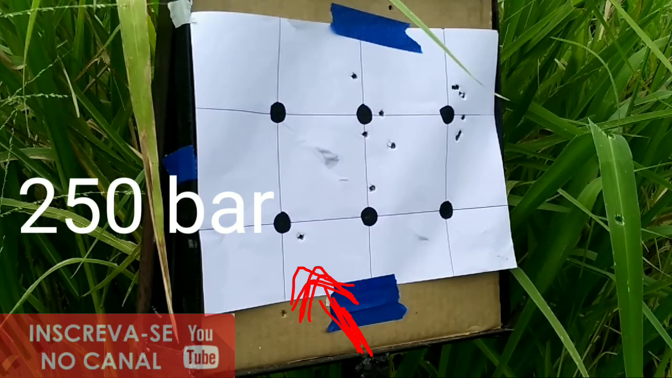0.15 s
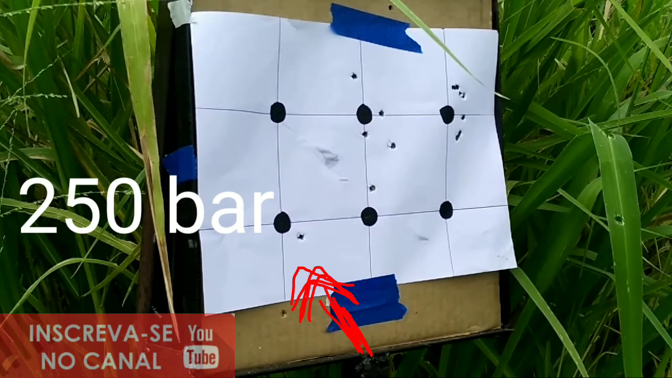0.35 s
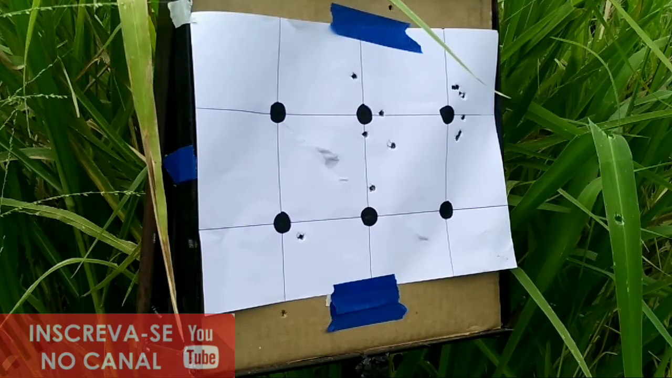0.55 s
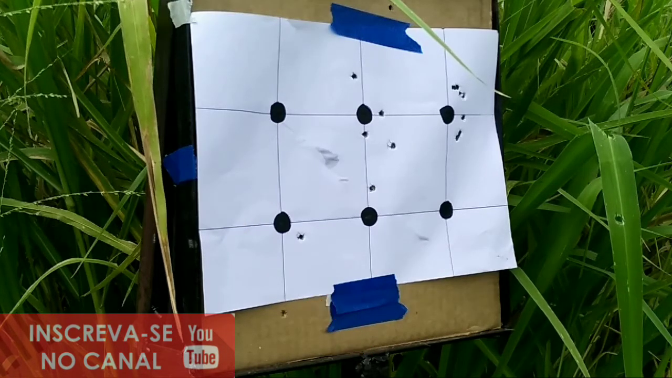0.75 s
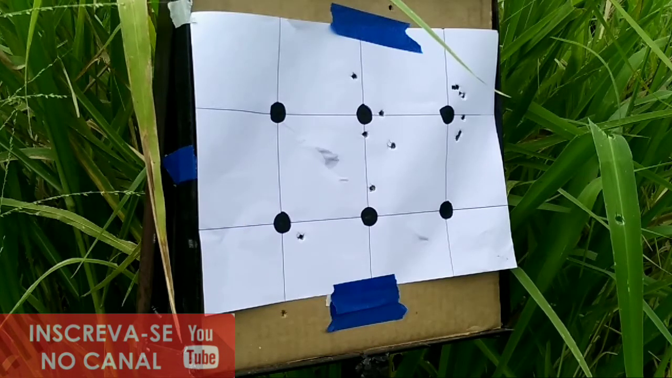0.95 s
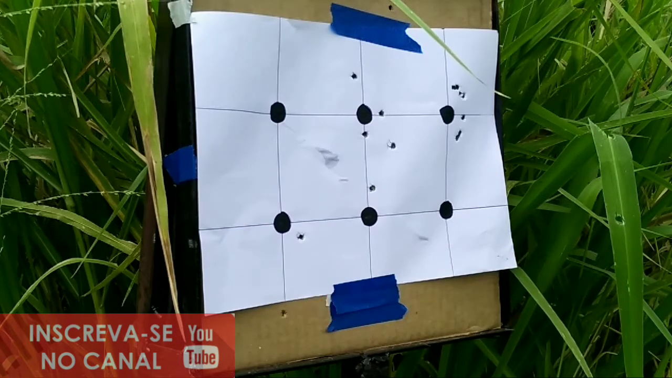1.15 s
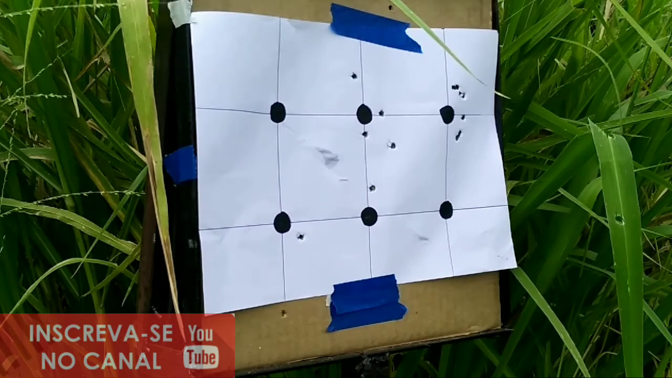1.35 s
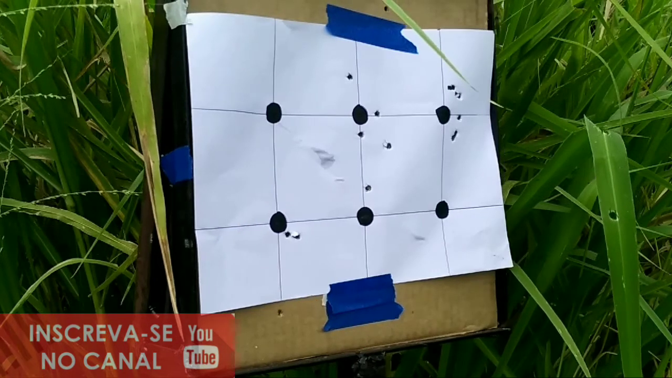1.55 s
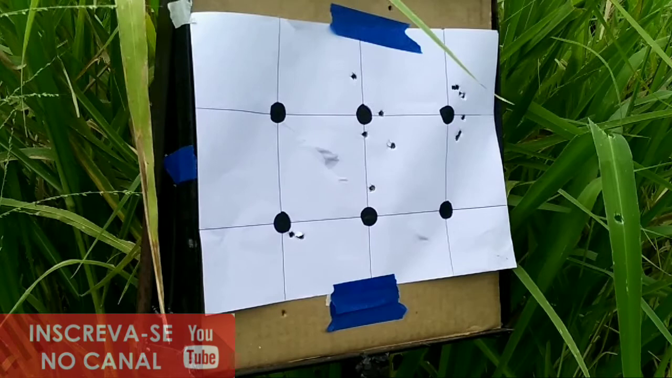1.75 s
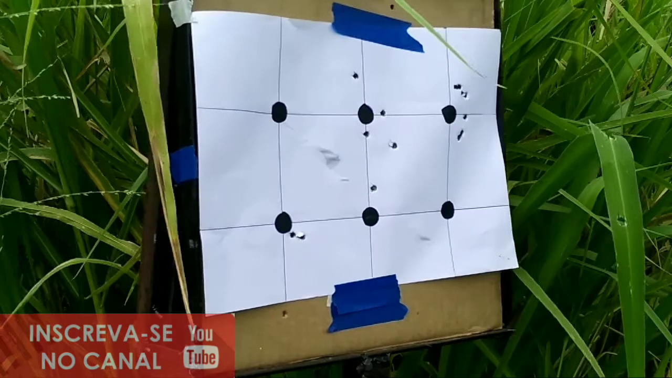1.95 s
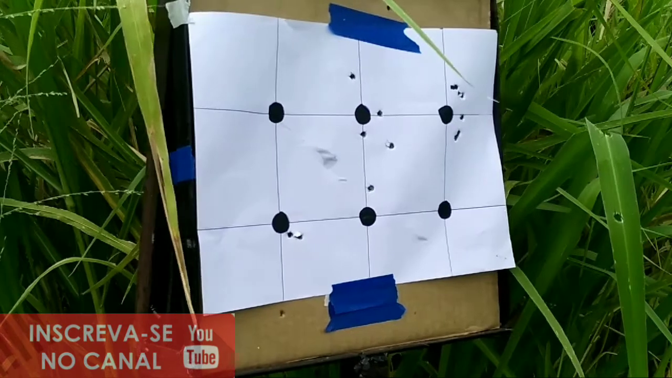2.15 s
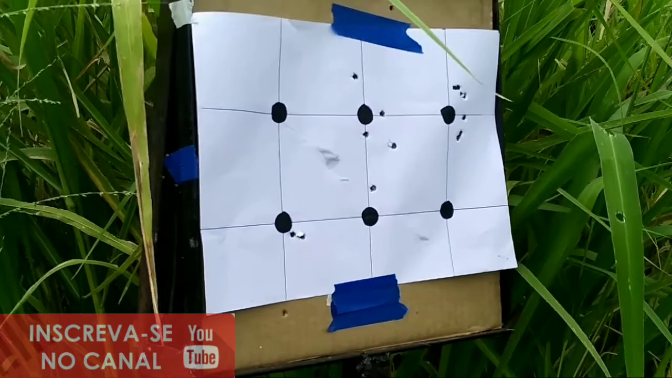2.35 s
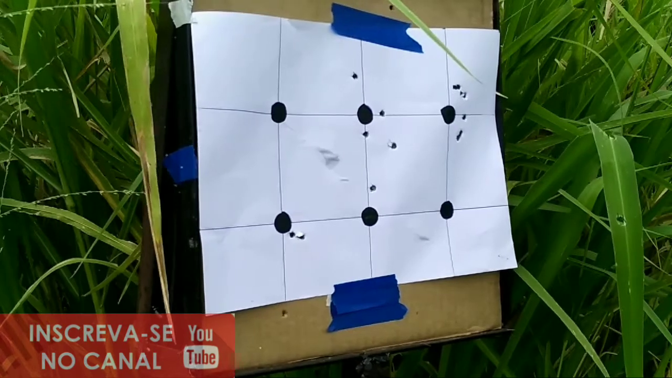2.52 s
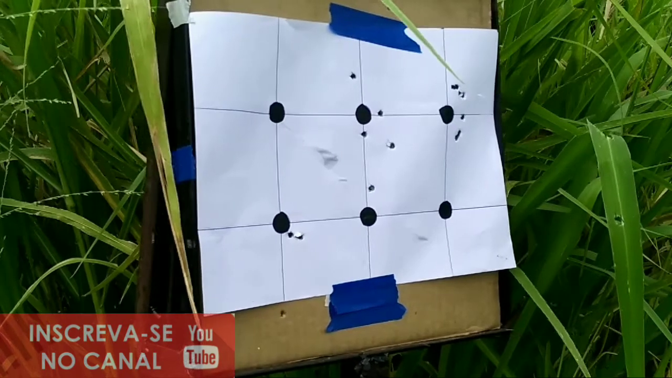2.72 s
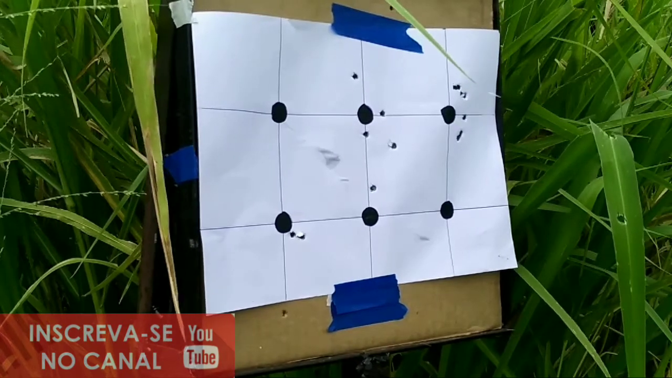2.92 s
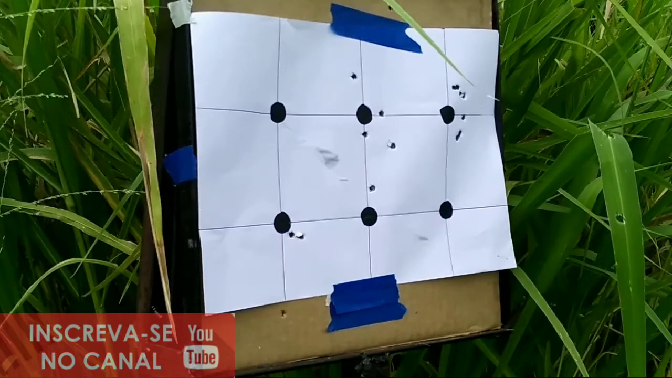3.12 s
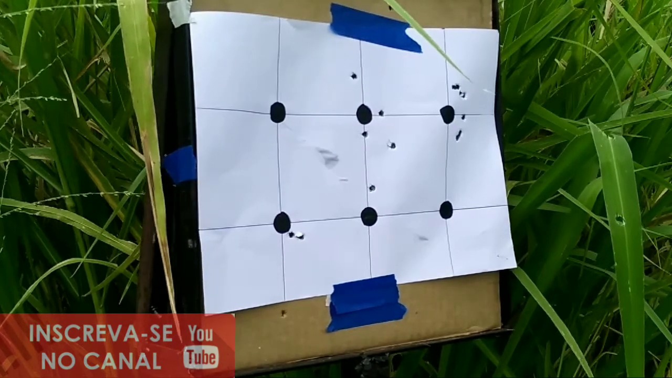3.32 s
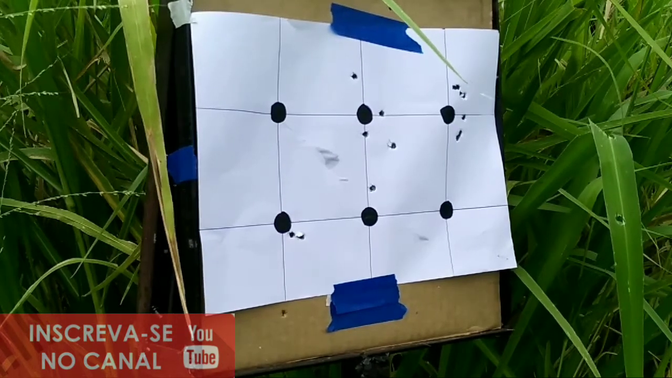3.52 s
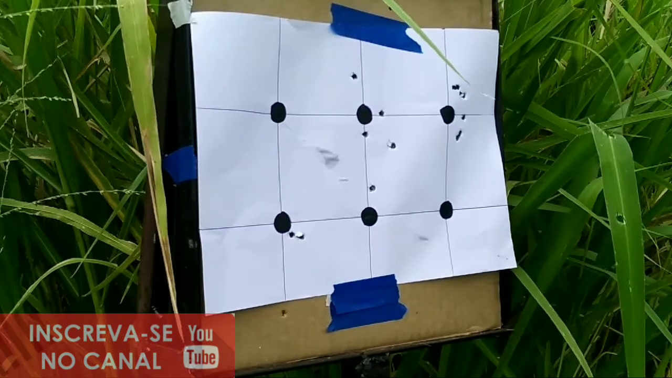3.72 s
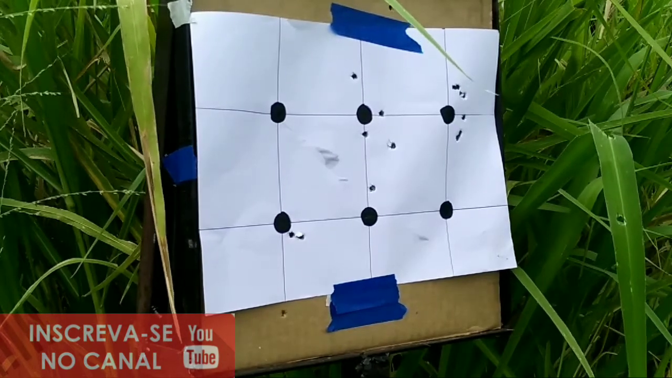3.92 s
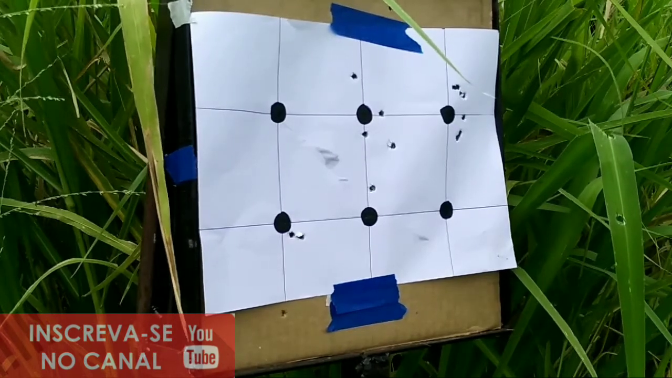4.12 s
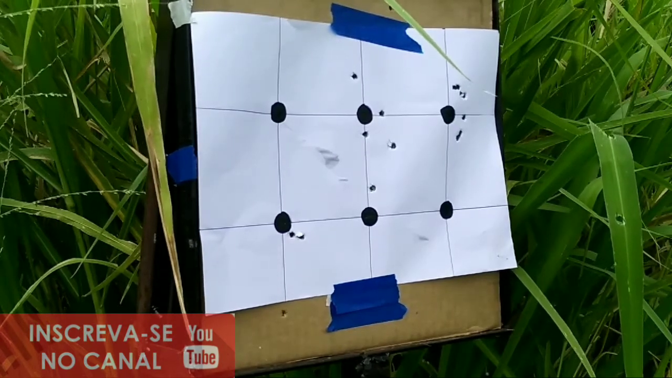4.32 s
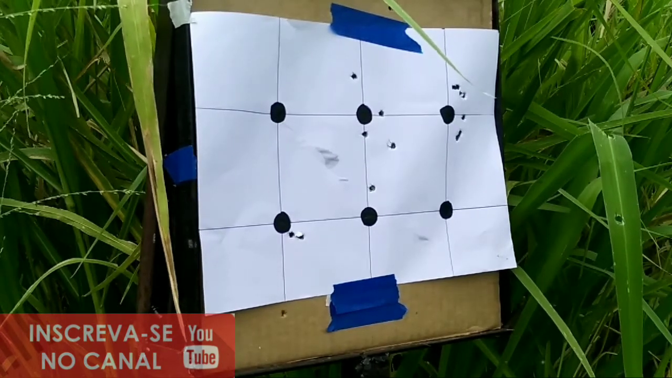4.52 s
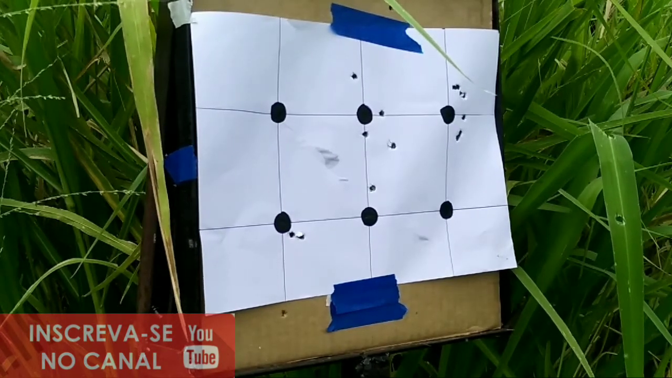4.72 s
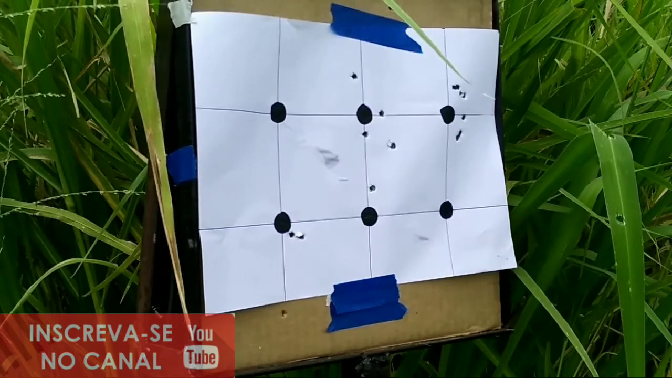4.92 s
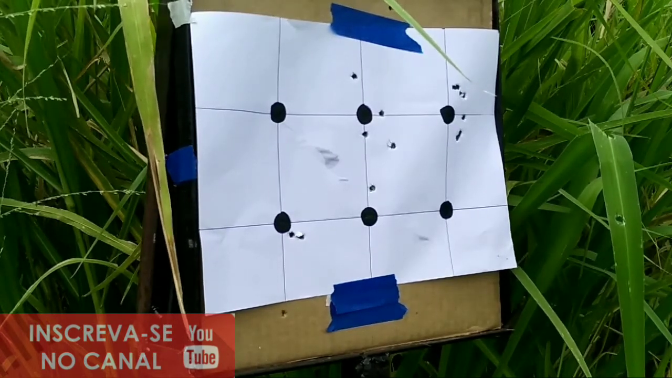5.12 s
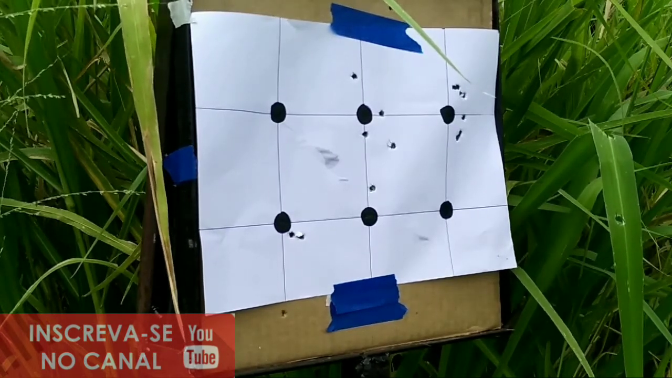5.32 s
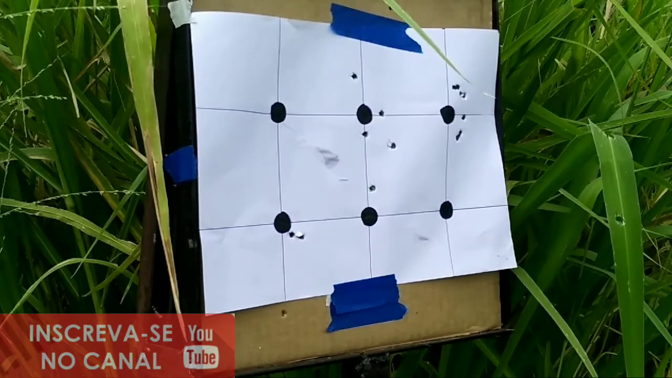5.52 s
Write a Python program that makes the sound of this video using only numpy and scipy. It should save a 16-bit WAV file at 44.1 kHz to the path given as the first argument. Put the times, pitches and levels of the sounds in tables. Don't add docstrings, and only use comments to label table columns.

```python
import sys
import numpy as np
from scipy import signal
from scipy.fft import rfft, irfft, next_fast_len
from scipy.io import wavfile
from scipy.ndimage import uniform_filter1d, map_coordinates

SR = 44100
rng = np.random.default_rng(int(sys.argv[2]) if len(sys.argv) > 2 else 0)


def wav_out(sig):
    wavfile.write(sys.argv[1], SR, np.round(np.clip(np.atleast_2d(sig).T, -1, 1) * 32767).astype(np.int16))


def voltage_ratio(decibels):
    exponent = np.asarray(decibels, float) / 20
    return 10 ** exponent


N = 250047

# start in seconds, peak in dB, t60 in seconds,
# centre in Hz, width in Hz.
IMPACT_BURSTS = [
    (1.4995, 4, .093, 10000, 7500),
    (1.4996, -3, 0.085, 3400, 4600),
    (1.504, -2, .035, 1194, 1600),
    (1.509, -9, .095, 8500, 5860),
    (1.5, -4, .044, 272.3, 260),
    (1.505, -6, .03, 695, 296),
]


def unit(x):
    return x / np.sqrt(np.mean(x ** 2) + 1e-20)


def level_curve(rows):
    s, db = np.transpose(rows)
    return np.interp(np.arange(N) / SR, s, db)


def during(rows):
    t = np.arange(N) / SR
    inside = (t > rows[0][0]) & (t < rows[-1][0])
    return uniform_filter1d(inside * 1., size=40)


def arch(s, length, sharp):
    u = np.clip((np.arange(N) / SR - s) / length, 0, 1)
    return u, np.abs(np.sin(np.pi * u)) ** sharp


def wobble(rate, count=N):
    knots = rng.standard_normal(int(count * rate / SR) + 4)
    return map_coordinates(knots, [np.arange(count) * rate / SR])


def filtered(x, response):
    m = next_fast_len(len(x) + 8192)
    return irfft(rfft(x, m) * response(np.fft.rfftfreq(m, 1 / SR)), m)[:len(x)]


def resonance(hz, width_hz):
    return lambda f: 1j * f * width_hz / (hz * hz - f * f + 1j * f * width_hz)


def rush(spectrum, patchy_db):
    z = signal.stft(rng.standard_normal(N), nperseg=512)[2]
    patches = uniform_filter1d(rng.standard_normal(z.shape), size=6, axis=0)
    patches = uniform_filter1d(patches, size=10, axis=1)
    x = signal.istft(z * voltage_ratio(patchy_db * unit(patches)), nperseg=512)[1][:N]
    hz, db = np.transpose(spectrum)
    return unit(filtered(x, lambda f: voltage_ratio(np.interp(np.log(f + 1), np.log(hz), db))))


def bursts(rows):
    grain_db = 2
    out, t = np.zeros(N + SR), np.arange(SR // 4) / SR
    for s, db, rise, t60, hz, width_hz in rows:
        grain_gain = voltage_ratio(grain_db * np.repeat(rng.standard_normal(len(t) // 25), 25))
        grains = rng.standard_normal(len(t)) * grain_gain
        band = resonance(hz, width_hz)
        puff = unit(filtered(grains, lambda f: band(f) ** 2))
        size = voltage_ratio(db - 3 - 60 * t / t60) * (1 - np.exp(-t / rise))
        out[round(s * SR):][:len(t)] += size * puff
    return out[:N]


def blows(rows):
    rise_cycles = 1.5
    return bursts([(s, db, rise_cycles / hz, t60, hz, wide) for s, db, t60, hz, wide in rows])


def glide(s, length, first_hz, last_hz, db, drift_hz, flutter_db):
    n, out = round(length * SR), np.zeros(N + 2 * SR)
    u = np.arange(n) / n
    hz = first_hz + (last_hz - first_hz) * u + drift_hz * wobble(30, count=n)
    size = np.sin(np.pi * u) ** 0.57 * voltage_ratio(db + flutter_db * wobble(25, count=n))
    out[SR + round(s * SR):][:n] = size * np.sin(2 * np.pi * np.cumsum(hz) / SR)
    return out[SR:SR + N]


def wind():
    # time in seconds, buffet level in dB.
    gusts = [(0, -51.5), (1.04, -52.5), (1.85, -52.5), (2.24, -50.5), (3.06, -53), (3.89, -51.5),
             (4.4, -53), (5.27, -52), (5.67, -54)]
    # frequency in Hz, density in dB per Hz.
    rumble_spectrum = [(12, -42), (22, -16), (40, -8), (72, 2.5), (103, -9), (216, -23), (320, -45.5),
                       (550, -120)]
    distance_spectrum = [(70, -33.5), (120, -4.5), (210, -14.5), (280, -9.5), (600, -10), (1050, -12),
                         (2000, -20.5), (5000, -43.5)]
    grass_spectrum = [(800, -41.5), (2000, -7.5), (3600, -4), (6000, -2.5), (9000, -1), (13000, -7.5),
                      (15700, -4.5), (18000, -23)]
    distance_db, grass_db = -56, -58
    buffet = voltage_ratio(level_curve(gusts) + 0.94 * wobble(6.5)) * rush(rumble_spectrum, patchy_db=1.36)
    distance = voltage_ratio(distance_db + .45 * wobble(3.15)) * rush(distance_spectrum, patchy_db=1.3)
    grass = voltage_ratio(grass_db + .48 * wobble(3.15)) * rush(grass_spectrum, patchy_db=1.7)
    return buffet + distance + grass


def insects():
    # middle in seconds, length in seconds, level in dB, brightness in dB.
    strokes = [(-.02, .16, -53.5, 3.5), (.18, 0.31, -51.5, 1), (0.441, .22, -50, -1.5), (.72, 0.22, -52, 1),
               (.99, 0.24, -53, 1), (1.24, .22, -53, 1), (1.45, 0.19, -51, -1), (1.72, .24, -54.5, 1),
               (1.9, 0.22, -55, -3), (2.169, 0.24, -58, -8), (2.39, 0.2, -52.5, -0.5),
               (2.664, 0.22, -53.5, 1.5), (2.878, 0.27, -53, -0.5), (3.14, .26, -52.5, 0.5),
               (3.341, 0.18, -52.5, 2), (3.47, .1, -57, 0), (3.58, 0.17, -50.5, 2.5),
               (3.834, 0.22, -49.5, -0.5), (4.06, 0.23, -53.5, 1), (4.246, 0.3, -55.5, 0.5),
               (4.47, .28, -51.5, -1), (4.68, .18, -54.5, -0.5), (4.84, 0.28, -56, 0),
               (5.03, .26, -52, -0.5), (5.26, .18, -55, 2), (5.38, .18, -52, -0.5), (5.5, .14, -55.5, 1.5),
               (5.62, .2, -53.5, -1.5)]
    # centre in Hz, width in Hz, level in dB.
    side_bands = [(3030, 700, -9.5), (5260, 1500, -7.5), (9490, 1870, -1.5), (12320, 1300, -11)]
    wing_mid_hz, climb_hz, half_width_hz = 7120, 450, 695
    swell_sharpness, rest_db = 2.1, -61
    sides_mid_db, sides_fade_db = -3, 1
    power, lean, bright = np.full(N, voltage_ratio(2 * rest_db)), np.zeros(N), np.zeros(N)
    for s, length, db, bright_db in strokes:
        u, swell = arch(s - length / 2, length, swell_sharpness)
        stroke_power = voltage_ratio(2 * db) * swell
        power += stroke_power
        lean += stroke_power * (u - .5)
        bright += stroke_power * bright_db
    along = lean / power

    teeth = (rng.random(N) < 1500 / SR) * voltage_ratio(3.5 * rng.standard_normal(N))
    clicks = teeth + .25 * rng.standard_normal(N)
    turn = np.exp(2j * np.pi * np.cumsum(wing_mid_hz + 2 * climb_hz * along) / SR)

    def low(x):
        return filtered(x, lambda f: 1 / (1 + 1j * f / half_width_hz) ** 3)

    main = low(clicks * turn.real) * turn.real + low(clicks * turn.imag) * turn.imag

    def side_response(f):
        return sum(voltage_ratio(db) * np.abs(resonance(hz, width)(f)) ** 2 for hz, width, db in side_bands)

    sides = filtered(clicks[::-1], side_response)
    sides_db = sides_mid_db - 2 * sides_fade_db * along + bright / power
    return np.sqrt(power) * voltage_ratio(0.57 * wobble(25)) * (unit(main) + voltage_ratio(sides_db) * unit(sides))


def engine():
    # start in seconds, length in seconds, first Hz, last Hz, level in dB.
    firing_note = (-.3, 1.6, 60, 81, -50)
    return glide(*firing_note, drift_hz=0.95, flutter_db=2.0)


def birds():
    # start in seconds, length in seconds, first Hz, last Hz, level in dB.
    whistles = [(.02, .34, 2490, 2760, -67), (.97, .16, 2500, 2310, -69), (1.1, .42, 2300, 2680, -67),
                (.04, .12, 1385, 1380, -63), (.25, .12, 1095, 1092, -61), (1.72, .36, 415, 415, -61),
                (2.12, .38, 415, 415, -56), (2.45, .45, 415, 410, -62), (2.04, .18, 535, 505, -59),
                (2.06, .1, 1053, 1053, -56), (3.1, .22, 1485, 1462, -60), (3.38, .16, 850, 860, -58),
                (3.57, .14, 805, 790, -61), (4.48, .22, 450, 600, -59), (4.65, .3, 590, 585, -65),
                (4.9, .15, 580, 445, -59), (5.0, .2, 1940, 1930, -68), (5.22, .16, 1925, 1925, -65),
                (5.11, .11, 1565, 1555, -66), (5.28, .2, 2110, 2115, -69), (5.3, .34, 820, 810, -64),
                (4.805, .022, 6700, 6000, -47), (1.84, .22, 2605, 2600, -60), (1.98, .09, 4800, 4800, -60)]
    return sum(glide(*row, drift_hz=4.3, flutter_db=1.8) for row in whistles)


def report():
    # start in seconds, peak in dB, t60 in seconds, centre in Hz, width in Hz.
    muzzle_bursts = [
        (1.4318, -9, .016, 4000, 4960),
        (1.4333, -1, .023, 3300, 2210),
        (1.4362, 3, .014, 6400, 3500),
        (1.4385, -1, .012, 5500, 5000),
        (1.441, -13, .27, 9000, 9000),
        (1.4335, -7, .026, 9800, 4000),
        (1.441, -22, .2, 2780, 2500),
        (1.4336, -11, .018, 1300, 1300),
        (1.4334, -6, .014, 6000, 3000),
    ]
    return blows(muzzle_bursts)


def slaps():
    # time in seconds, peak in dB, centre in Hz.
    pulses = [(1.4333, -4.5, 3000), (1.437, -26.5, 163.8), (1.452, -0.5, 4975), (1.4554, -8, 4000),
              (1.499, -4.5, 4016), (1.5014, -9, 596), (1.5063, -11.5, 807), (1.5092, -13.5, 308),
              (1.53, -11, 9000), (2.6915, -29.5, 8500), (1.51, -29.5, 44), (1.507, -23, 150)]
    t, out = np.arange(N) / SR, np.zeros(N)
    for s, db, hz in pulses:
        u = 3.74 * hz * (t - s)
        out -= voltage_ratio(db) * (1 - u * u) * np.exp(-u * u / 2)
    return out


def pellet_flight():
    # time in seconds, level in dB.
    approach = [
        (1.445, -31),
        (1.47, -22.5),
        (1.484, -11.5),
        (1.493, -11.5),
        (1.497, -14),
        (1.5, -21),
    ]
    # frequency in Hz, density in dB per Hz.
    hiss_spectrum = [(600, -48), (1500, -27), (3500, -20), (6500, -20), (9200, -5.5), (12000, -8),
                     (15300, -6.5)]
    size = voltage_ratio(level_curve(approach) + 3.2 * wobble(900)) * during(approach)
    return size * rush(hiss_spectrum, patchy_db=2.5)


def impact():
    return blows(IMPACT_BURSTS)


def backstop():
    # mode in Hz, level in dB, t60 in seconds, swell in seconds, stop in seconds.
    modes = [(515, -30, .59, .0096, 1.665), (734, -34.5, 0.68, 0.028, 1.67), (870, -46.5, 1.4, .02, 1.66),
             (1230, -32.5, 0.45, 0.0089, 1.8), (1276, -41, 1.5, 0.14, 1.645), (2024, -20, .36, 0.015, 1.66),
             (2606, -38.5, 0.63, .01, 2), (2905, -9, 0.33, 0.15, 1.84)]
    struck = IMPACT_BURSTS[0][0]
    t = np.maximum(np.arange(N) / SR - struck, 0)
    out = np.zeros(N)
    for hz, db, t60, swell, stop in modes:
        damped_db = -60 * np.maximum(t + struck - stop, 0) / 0.039
        size = voltage_ratio(db - 60 * t / t60 + damped_db + 2.2 * wobble(45)) * np.minimum(t / swell, 1) ** 4
        out += size * np.sin(2 * np.pi * hz * t + .3 * wobble(60))
    return out


def field_answer():
    # time in seconds, level in dB.
    fading = [(1.5, -10.5), (1.55, -28), (1.64, -32), (1.77, -41.5), (1.8, -47.5), (1.86, -42.5),
              (2.1, -48.5), (2.14, -52), (2.9, -62)]
    # frequency in Hz, density in dB per Hz.
    field_spectrum = [(200, -48.5), (400, -23), (800, -15), (2200, -15), (5000, -14), (8000, -9),
                      (10300, -9), (15300, -20.5)]
    air_hz, dull_from_s, dull_over_s, dull_share = 10400, 1.78, .12, 0.67
    field = rush(field_spectrum, patchy_db=1.5)
    far = dull_share * np.clip((np.arange(N) / SR - dull_from_s) / dull_over_s, 0, 1)
    field = field - far * filtered(field, lambda f: 1 / (1 + (air_hz / (f + 1)) ** 6))
    return voltage_ratio(level_curve(fading) + 1.1 * wobble(90) + 2.36 * wobble(500)) * during(fading) * field


def echoes():
    # start in seconds, peak in dB, t60 in seconds, centre in Hz.
    returns = [(1.634, -18.5, 0.052, 9500), (1.662, -21, .06, 9500), (1.706, -29.5, .15, 7050),
               (1.727, -26.5, 0.035, 7530), (1.7476, -18.5, .04, 9550), (1.805, -33, 0.064, 9000),
               (1.84, -29.5, .1, 5840), (1.838, -39, 0.31, 3200), (1.865, -32, 0.063, 6000),
               (1.9017, -27, 0.082, 7400), (1.93, -47, 0.96, 2700), (2.62, -42, 0.046, 11000),
               (2.693, -46, 0.089, 10840)]
    rise_share, wide_share = 0.051, 0.88
    return bursts([(s, db, rise_share * t60, t60, hz, wide_share * hz) for s, db, t60, hz in returns])


def scraps():
    # start in seconds, peak in dB, centre in Hz.
    ticks = [(1.778, -37.5, 7500), (1.927, -40, 12000), (1.962, -41.5, 13000), (2.007, -49, 11970),
             (2.047, -35, 10000), (2.058, -39, 9040), (2.105, -43, 11000), (2.175, -44, 13100),
             (2.19, -41.5, 13000), (2.25, -46.5, 13000), (2.272, -43, 11000), (2.39, -45, 14500),
             (2.595, -41, 12070), (2.6903, -28.5, 9500), (2.6903, -44, 4000), (2.944, -42, 4000),
             (3.33, -45, 3500)]
    rise_s, t60_s, wide_share = .001, .02, .6
    return bursts([(s, db, rise_s, t60_s, hz, wide_share * hz) for s, db, hz in ticks])


def scene():
    ambience = wind() + insects() + engine() + birds()
    shot = report() + slaps() + pellet_flight() + impact()
    aftermath = backstop() + field_answer() + echoes() + scraps()
    return (ambience + shot + aftermath)[None]


def roll_off(x):
    return signal.sosfilt(signal.butter(12, 15400, fs=SR, output="sos"), x)


def record(dry):
    saturated = dry / (1 + np.abs(dry) ** 8) ** (1 / 8)
    limited = filtered(saturated[0], lambda f: np.where(f < 15420, 1, voltage_ratio(-40)))[None]
    return roll_off(np.clip(limited, -1, 1))


dry = scene()
out = record(dry)
wav_out(out)
```